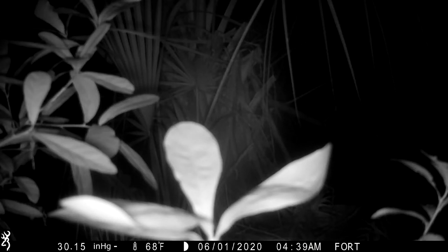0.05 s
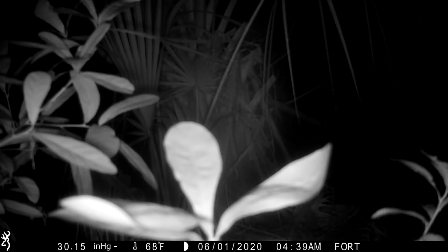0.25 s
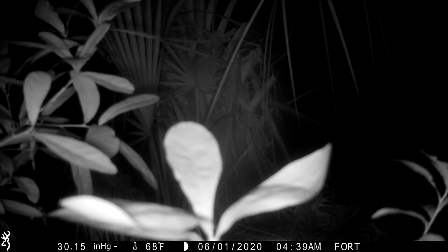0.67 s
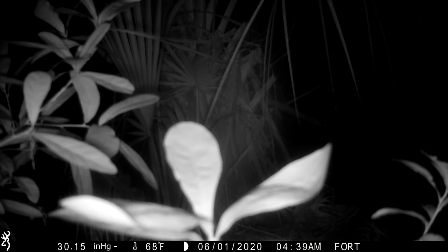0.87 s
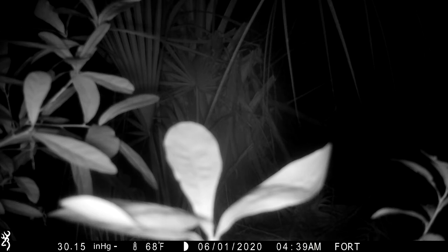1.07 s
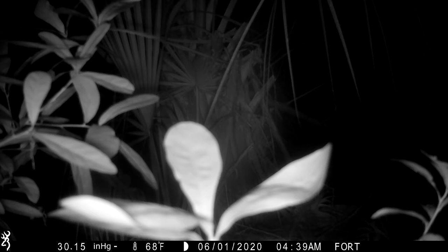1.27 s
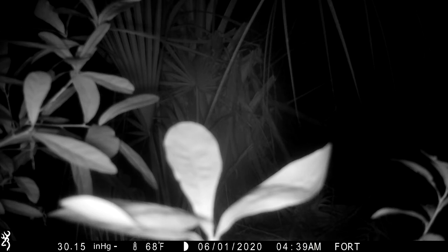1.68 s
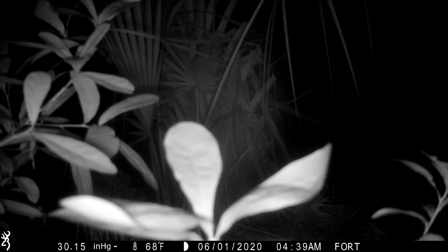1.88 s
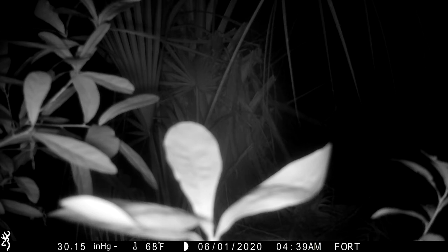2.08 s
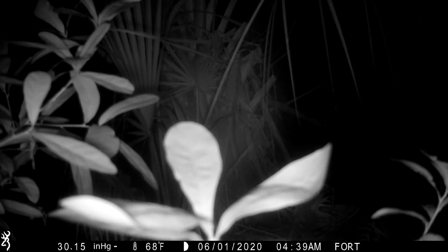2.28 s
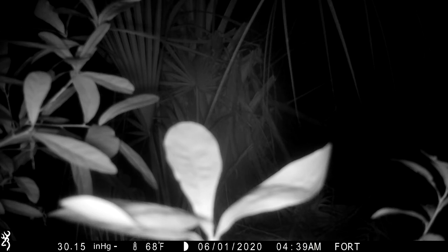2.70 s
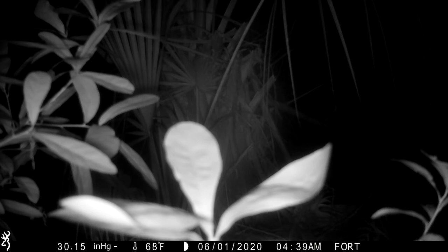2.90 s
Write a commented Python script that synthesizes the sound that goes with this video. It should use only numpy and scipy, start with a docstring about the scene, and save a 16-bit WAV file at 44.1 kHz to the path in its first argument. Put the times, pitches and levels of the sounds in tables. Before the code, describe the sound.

Distant coyotes call through a night wood, dulled and echoing. A hoarse bark at 0.2 seconds leads into yelps, and a high wavering howl runs from 0.5 to 1.5 seconds with more yelps over it. Leaves tick nearby, and a small animal peeps softly around 1.8. Another bark at 2.2 starts quick yelps lasting until 2.7. Faint crickets, a soft rush and a thin electronic whine continue throughout.

```python
"""Distant coyotes in a night wood

A hoarse bark and a yelp, a high wavering howl with a second yelp over it, then another bark and a run
of yelps: trembling vocal folds shaped by mouth and jaws, dulled by distance and smeared by the trees.
Crickets chirp over a soft far rush, leaves tick nearby, a small animal peeps, electronics whine thinly."""
import sys
import numpy as np
from scipy import signal
from scipy.fft import rfft, irfft, next_fast_len
from scipy.io import wavfile

SR = 44100
rng = np.random.default_rng(int(sys.argv[2]) if len(sys.argv) > 2 else 0)


def store_pcm(level_fs):
    """Save levels as 16-bit WAV."""
    pcm = np.round(np.clip(level_fs, -1, 1) * 32767).astype(np.int16)
    wavfile.write(sys.argv[1], SR, np.atleast_2d(pcm).T)


N = 134505
TIME = np.arange(N) / SR


# The howl's melody and dynamics: time_s, pitch_hz, level_db
HOWL_CONTOUR = [(0.514, 1267, -35), (.55, 1279, -33.5), (0.594, 1271, -44), (0.614, 1237, -29.5),
                (0.643, 1281, -33), (0.676, 1374, -31), (0.699, 1489, -36), (.733, 1388, -31),
                (.765, 1410, -42), (0.786, 1590, -36.5), (0.859, 1564, -45), (0.923, 1630, -38),
                (1.008, 1650, -43), (1.035, 1427, -32), (1.062, 1517, -37.5), (1.103, 1573, -38.5),
                (1.167, 1442, -39.5), (1.271, 1325, -37), (1.302, 1344, -26), (1.324, 1330, -39),
                (1.348, 1368, -30.5), (1.384, 1348, -36), (1.455, 1341, -42.5)]

def howl(warble_hz=41, warble_depth=.12, warble_start_s=.625, warble_length_s=.595):
    """A high, slightly breathy note that breaks into a fast uneven warble and settles to a quaver."""
    time_s, pitch_hz, level_db = np.transpose(HOWL_CONTOUR)
    shaking = gate(warble_start_s, warble_length_s, attack_s=.0994, release_s=.13)
    shaking = np.maximum(shaking, .14 * (TIME > warble_start_s))  # a light quaver stays on
    pitch_dips = (1 + np.sin(trembling_phase(warble_hz, jitter=.3036))) / 2
    pitch = np.interp(TIME, time_s, pitch_hz) * (1 - warble_depth * shaking * pitch_dips)
    phase = trembling_phase(pitch, jitter=.01398)
    voice = rms_one(from_db(-2) * np.sin(phase) + from_db(-27.5) * np.sin(2 * phase))
    breath = drift(rate_hz=110) * np.sin(phase) + drift(rate_hz=110) * np.cos(phase)
    envelope = gate(time_s[0], time_s[-1] - time_s[0], attack_s=.015, release_s=.04)
    return (voice + .18 * breath) * from_db(np.interp(TIME, time_s, level_db)) * envelope


# Tone of the hoarse air in the throat: frequency_hz, relative_db
THROAT_SPECTRUM = [(300, -32), (700, -12), (1000, -9), (1280, 8.5), (1650, 1.5), (2100, -5.5), (2600, -11),
                   (3500, -26), (6000, -44.5)]
# The mouth's EQ on the overtones: frequency_hz, gain_db
MOUTH_RESPONSE = [(1400, -5.5), (1650, -3.5), (1950, -1), (2200, -19), (2480, -3.5), (2650, -15.5),
                  (3000, -27.5), (4200, -29)]
# One pitch arch per row: start_s, length_s, start_hz, top_hz, end_hz, top_at_fraction,
# level_db, swell_db (start to end), overtones_db, jitter_fraction, hoarse_db
YELP_CUES = [(0.297, 0.03, 700, 724, 702, 0.5, -40, 3, -5.5, 0.019, -7.5),
             (0.405, 0.075, 660, 801.4, 707, 0.63, -36.5, 6.5, -3.5, 0.047, -7.5),
             (.483, 0.079, 935, 1023, 990, 0.57, -43, -5, 9.5, 0.027, -7),
             (1.122, 0.073, 868, 909, 930, 0.94, -40.5, -6.5, -4, 0.013, -15),
             (1.201, 0.099, 925, 1015, 966, 0.53, -45, -2.5, 8, 0.027, -7.5),
             (1.309, 0.02, 900, 888, 800, .2, -36, 5, -9, 0.017, -6),
             (2.241, 0.03, 700, 721, 643, 0.34, -40.5, 3, -21, 0.023, -2.5),
             (2.389, 0.08, 690, 827.3, 747, 0.71, -38, 7, -7.5, 0.035, -8),
             (2.485, 0.0465, 880, 831, 752, .3, -49, 4, 4.5, 0.0311, 0),
             (2.522, 0.055, 1215, 1221, 1190, 0.44, -44.5, 0, -22, 0.013, -10),
             (2.584, 0.028, 750, 770.5, 780, 0.8, -37, 0, -8.5, 0.02, -20),
             (2.59, 0.0606, 985, 1019, 943, 0.51, -38, 1, -1, 0.016, -12),
             (2.643, 0.038, 1020, 1022, 1004, 0.64, -46.5, -6, 9.5, 0.0154, -2)]

def yelps(rasp_depth=.21, subharmonic_depth=.23):
    """Short raspy cries whose overtones sweep through the mouth's resonances; air pulses each cycle."""
    out, air = np.zeros(N), coloured_noise(THROAT_SPECTRUM)
    mouth_hz, mouth_db = np.transpose(MOUTH_RESPONSE)
    for start_s, length_s, *bend, level_db, swell_db, overtones_db, jitter, hoarse_db in YELP_CUES:
        pitch = pitch_arch(start_s, length_s, *bend)
        phase = trembling_phase(pitch, jitter)
        overtones = sum(from_db(overtones_db + np.interp(k * pitch, mouth_hz, mouth_db))
                        * np.sin(k * phase) for k in range(2, 5))
        voice = np.sin(phase) + overtones * (1 + subharmonic_depth * np.cos(phase / 2))
        rasp = 1 + rasp_depth * drift(rate_hz=230)
        hoarse = from_db(hoarse_db) * air * (1 + np.cos(phase) / 2)
        gain = from_db(level_db + swell_db * (progress(start_s, length_s) - .5))
        envelope = gate(start_s, length_s, attack_s=.0051, release_s=.016)
        out += gain * envelope * (np.sqrt(2) * voice * rasp + hoarse)
    return out


# Formants of the jaws: centre_hz, half_width_hz (per filter stage), relative_db, change_db (start to end)
JAW_FORMANTS = [(698, 92, -11.5, -3), (930, 120, -0.5, -8), (1154, 170, 0, -16), (1420, 120, -9.5, 5),
                (1854, 65, 3, 3.5), (2390, 220, -14.5, -1.5)]
# One bark per row: start_s, length_s, start_hz, top_hz, end_hz, top_at_fraction, level_db
BARK_CUES = [(0.211, 0.1051, 568, 627.5, 614.4, 0.68, -36), (2.184, 0.13, 589.7, 619.9, 616, 0.26, -40)]

def barks(subharmonic_depth=.38, rasp_mix=.72):
    """Alternately strong and weak pulses with rasp in every cycle, shaped by the moving jaws."""
    out = np.zeros(N)
    for start_s, length_s, *bend, level_db in BARK_CUES:
        phase = trembling_phase(pitch_arch(start_s, length_s, *bend), jitter=.012)
        pulses = sum(np.cos(k * phase) for k in range(1, 6))
        pulses *= 1 + subharmonic_depth * np.cos(phase / 2)
        rasp = rng.standard_normal(N) * (1 + np.cos(phase))
        jaw_travel = progress(start_s, length_s) - .5
        envelope = gate(start_s, length_s, attack_s=.026, release_s=.039)
        for source, mix in ((pulses, 1), (rasp, rasp_mix)):
            formants = sum(from_db(db + change_db * jaw_travel) * resonate(source, hz, 2 * half_width_hz)
                           for hz, half_width_hz, db, change_db in JAW_FORMANTS)
            cry = envelope * formants
            out += mix * from_db(level_db) * cry * np.linalg.norm(envelope) / np.linalg.norm(cry)
    return out


def wood(calls, air_loss_hz=2670, direct_db=-3.5, tree_line_s=.064, tree_line_db=-9, build_s=.0061):
    """Distance dulls the calls, a tree line slaps them back and countless trunks scatter them."""
    dulled = signal.sosfilt(signal.butter(2, air_loss_hz, fs=SR, output="sos"), calls)
    impulse_response = np.zeros(N)
    for t60_s, level_db in ((.7, -3.6), (1.6, -19)):  # near tail, far tail
        tail = rng.standard_normal(N) * from_db(-60 * TIME / t60_s) * (1 - np.exp(-TIME / build_s))
        impulse_response += from_db(level_db) * tail / np.linalg.norm(tail)
    slapback = np.interp(TIME - tree_line_s, TIME, dulled, left=0)
    reverb = signal.fftconvolve(dulled, impulse_response)[:N]
    return from_db(direct_db) * dulled + from_db(tree_line_db) * slapback + reverb


# The nearest cricket's chirps: centre_s
CHIRP_CUES = [.07, .275, .44, .635, .79, .965, 1.17, 1.38, 1.59, 1.771, 1.97, 2.152, 2.369, 2.541, 2.72,
              2.89]

def near_cricket(pitch_hz=5468, level_db=-67, echo_db=-74.5):
    """One cricket chirps at an even strength over the steady wash of its own echo."""
    chirps = sum(swell(TIME - centre_s, length_s=.099) for centre_s in CHIRP_CUES)
    tone = np.sqrt(2) * np.sin(trembling_phase(pitch_hz, jitter=.0036))
    return from_db(level_db) * tone * chirps + from_db(echo_db) * blurred_tone(pitch_hz, width_hz=150)


# One cricket per row: first_centre_s, period_s, length_s, pitch_hz, width_hz, level_db
CRICKET_CHORUS = [(-.02, .187, .11, 5580, 50, -74), (.22, .635, .22, 6600, 130, -81),
                  (.38, .36, .22, 6100, 350, -83)]

def far_crickets(echo_floor=.25):
    """Farther crickets, blurred by foliage, each keep their own steady beat."""
    out = np.zeros(N)
    for first_centre_s, period_s, length_s, pitch_hz, width_hz, level_db in CRICKET_CHORUS:
        from_centre_s = (TIME - first_centre_s + period_s / 2) % period_s - period_s / 2
        chirps = swell(from_centre_s, length_s)
        out += from_db(level_db) * blurred_tone(pitch_hz, width_hz) * (chirps + echo_floor)
    return out


# Tone of a leaf tick: frequency_hz, relative_db
TICK_SPECTRUM = [(500, -19.5), (1000, -10.5), (2000, 8.5), (3800, 5.5), (5500, -13), (8000, -18),
                 (11000, -47)]
# One tick per row: start_s, level_db
TICK_CUES = [(0.083, -44.5), (0.373, -48.5), (0.545, -42.5), (.594, -50), (0.853, -45.5), (0.886, -43),
             (0.937, -50), (1.178, -49), (1.478, -51.5), (1.816, -48.5)]

def leaf_ticks(attack_s=.002, decay_s=.0098):
    """Tiny dry snaps in the leaves that die at once."""
    envelope = sum(from_db(db) * progress(start_s, attack_s) * np.exp(-np.abs(TIME - start_s) / decay_s)
                   for start_s, db in TICK_CUES)
    return envelope * coloured_noise(TICK_SPECTRUM)


# One peep per row: centre_s, length_s, pitch_hz, level_db
PEEP_CUES = [(1.762, .03, 2134, -54), (1.852, 0.023, 2540, -52), (3.018, 0.024, 2750, -59)]

def peeps():
    """A small animal's short soft notes, just above the rush."""
    return sum(from_db(level_db) * swell(TIME - centre_s, length_s) * blurred_tone(pitch_hz, width_hz=135)
               for centre_s, length_s, pitch_hz, level_db in PEEP_CUES)


# Tone of the background bed: frequency_hz, relative_db
RUSH_SPECTRUM = [(20, -24), (45, -6), (62, -7.5), (82, -12), (130, -4.5), (185, -2.5), (225, 0.5),
                 (290, -2.5), (400, -4.5), (600, -0.5), (900, 1.5), (1350, 0), (1800, -4), (2600, -9.5),
                 (3500, -16), (5000, -26), (7000, -37), (9000, -43.5), (11000, -46.5)]

def distant_rush(level_db=-49):
    """A soft, steady bed of dark noise."""
    return from_db(level_db) * coloured_noise(RUSH_SPECTRUM)


def whine(pitch_hz=7797, flips_per_s=59.3, level_db=-74.5):
    """A thin electronic tone that flips polarity at a steady rate."""
    polarity = np.sign(np.sin(np.pi * flips_per_s * TIME))
    return from_db(level_db) * np.sqrt(2) * np.sin(2 * np.pi * pitch_hz * TIME) * polarity


def from_db(db):
    """Decibels to gain."""
    return 10 ** (np.asarray(db) / 20)


def rms_one(x):
    """Scale to unit power."""
    return x / np.sqrt(np.mean(x ** 2) + 1e-20)


def drift(rate_hz):
    """Smooth random modulation of unit power, rolling off above rate_hz."""
    hop, settle = 40, 2000
    pole = np.exp(-2 * np.pi * rate_hz * hop / SR)
    noise = rng.standard_normal(N // hop + settle + 2)
    slow = signal.lfilter([1], [1, -2 * pole, pole * pole], noise)[settle:]
    return np.interp(np.arange(N) / hop, np.arange(len(slow)), rms_one(slow))


def coloured_noise(spectrum):
    """Unit-power noise shaped by an EQ curve."""
    hz, db = np.transpose(spectrum)
    size = next_fast_len(N)
    bins_hz = np.maximum(np.fft.rfftfreq(size, 1 / SR), 1)
    gain = from_db(np.interp(np.log(bins_hz), np.log(hz), db))
    return rms_one(irfft(rfft(rng.standard_normal(size)) * gain, size)[:N])


def resonate(x, hz, width_hz):
    """Two band-pass stages in series, each width_hz wide with gain 1 at its peak."""
    r = np.exp(-np.pi * width_hz / SR)
    b = np.array([1, 0, -1]) * (1 - r * r) / 2
    a = [1, -2 * r * np.cos(2 * np.pi * hz / SR), r * r]
    return signal.lfilter(b, a, signal.lfilter(b, a, x))


def blurred_tone(hz, width_hz):
    """A thin tone scattered by the foliage into a narrow band of noise."""
    return rms_one(resonate(rng.standard_normal(N), hz, width_hz))


def progress(start_s, length_s):
    """A ramp from 0 to 1 across an event."""
    return np.clip((TIME - start_s) / length_s, 0, 1)


def gate(start_s, length_s, attack_s, release_s):
    """Attack, hold and release; the release straddles the end."""
    return progress(start_s, attack_s) * np.clip((start_s + length_s - TIME) / release_s + .5, 0, 1)


def swell(from_centre_s, length_s):
    """A rounded fade in and out."""
    return np.cos(np.pi * np.clip(from_centre_s / length_s, -.5, .5))


def pitch_arch(start_s, length_s, start_hz, top_hz, end_hz, top_at):
    """A pitch bend of two parabolas that meet and level off at top_hz."""
    past_top = progress(start_s, length_s) - top_at
    lead_in = (start_hz - top_hz) * (past_top / top_at) ** 2
    lead_out = (end_hz - top_hz) * (past_top / (1 - top_at)) ** 2
    return top_hz + np.where(past_top < 0, lead_in, lead_out)


def trembling_phase(hz, jitter):
    """Phase of an oscillator whose rate wavers by the fraction jitter."""
    return 2 * np.pi * np.cumsum(hz * (1 + jitter * drift(rate_hz=90.5))) / SR


def scene():
    """The pack far off among the trees, the night ambience all around, in mono."""
    rush = distant_rush()
    pack = wood(howl() + yelps() + barks())
    return (pack + rush + near_cricket() + far_crickets() + peeps() + leaf_ticks())[None]


def record(dry):
    """The electronics add their whine; a steep low-pass cuts the top."""
    cutoff_hz = 11300
    return signal.sosfilt(signal.ellip(10, .1, 80, cutoff_hz, fs=SR, output="sos"), dry + whine())


dry = scene()
out = record(dry)
store_pcm(out)
```